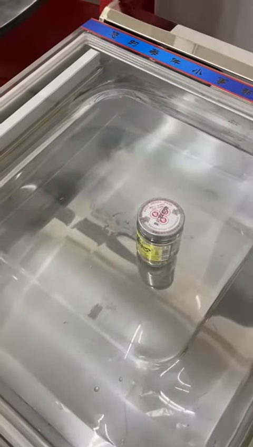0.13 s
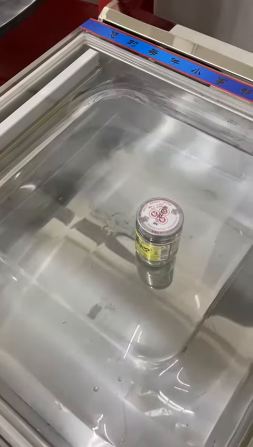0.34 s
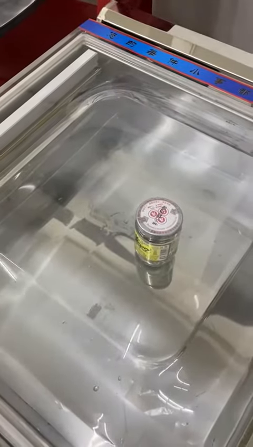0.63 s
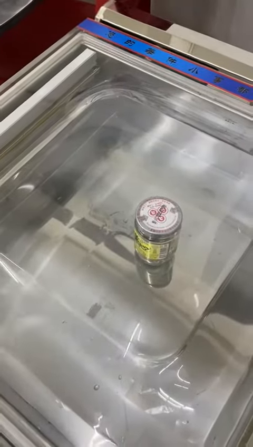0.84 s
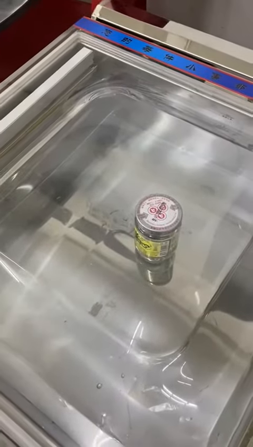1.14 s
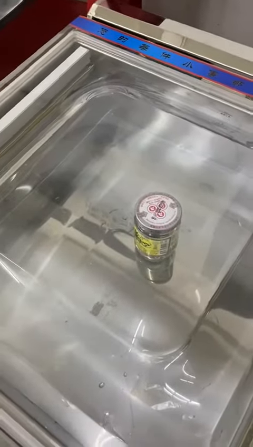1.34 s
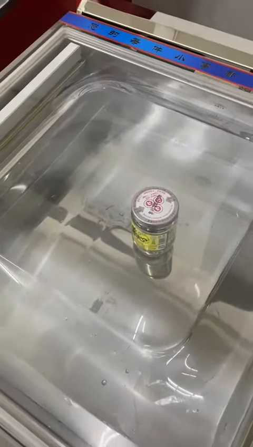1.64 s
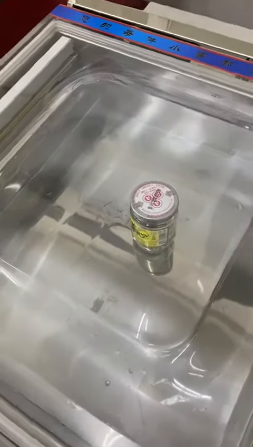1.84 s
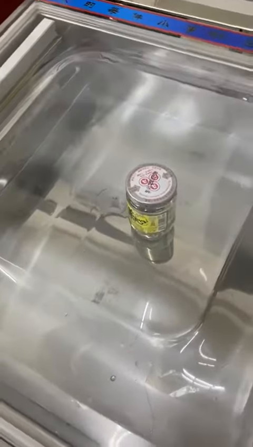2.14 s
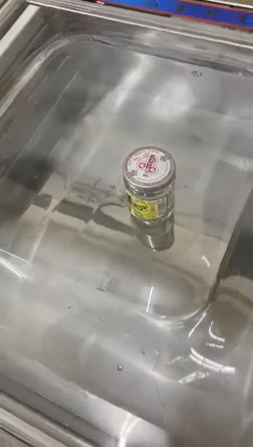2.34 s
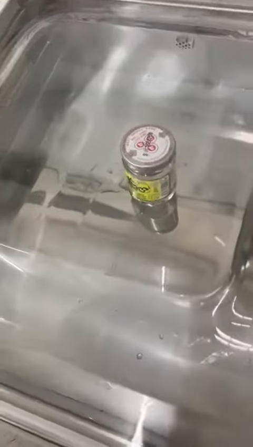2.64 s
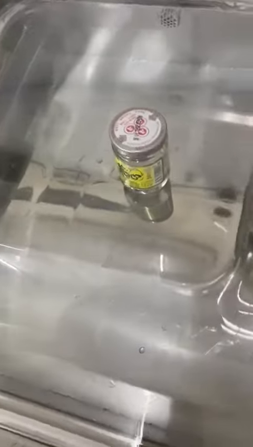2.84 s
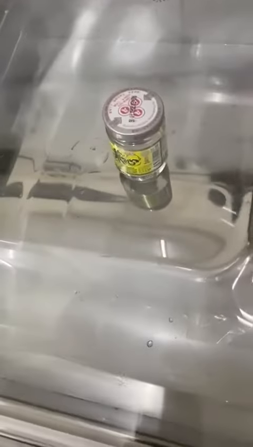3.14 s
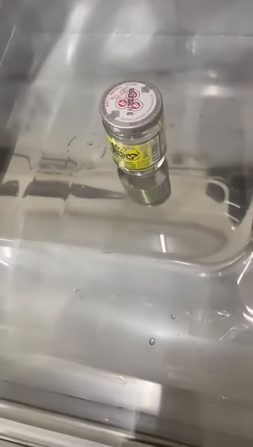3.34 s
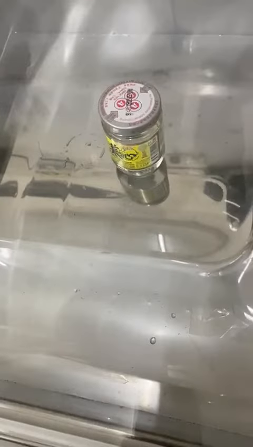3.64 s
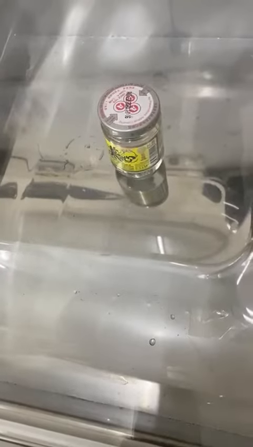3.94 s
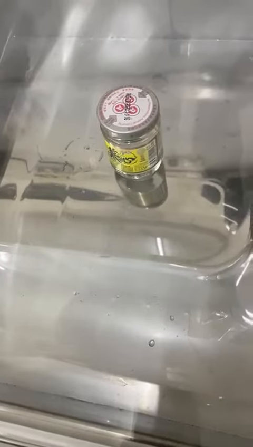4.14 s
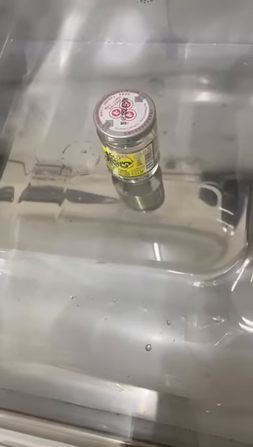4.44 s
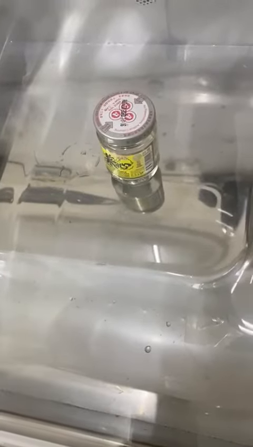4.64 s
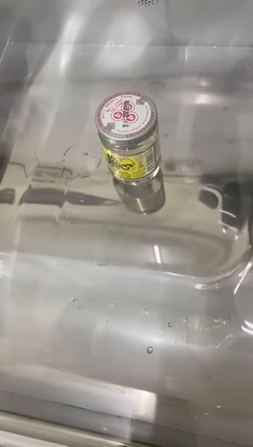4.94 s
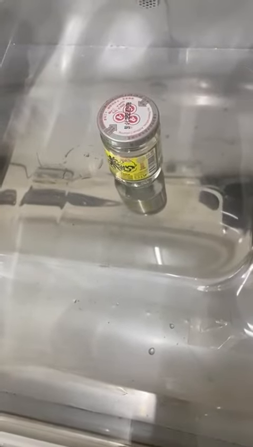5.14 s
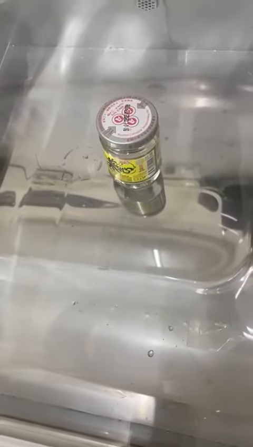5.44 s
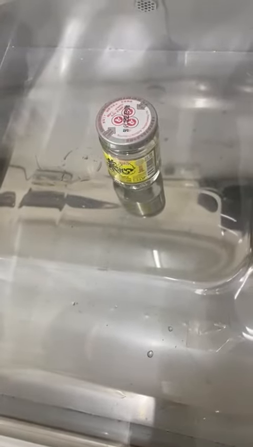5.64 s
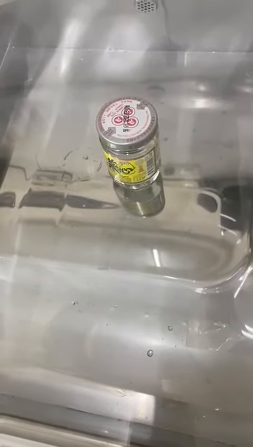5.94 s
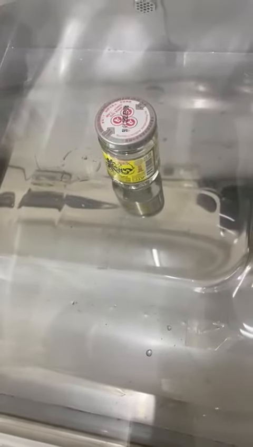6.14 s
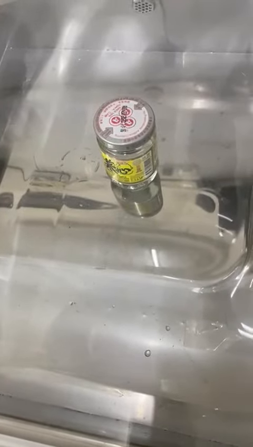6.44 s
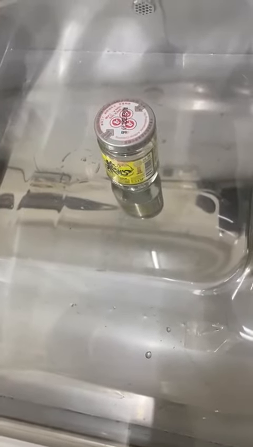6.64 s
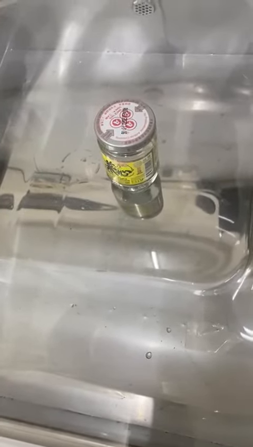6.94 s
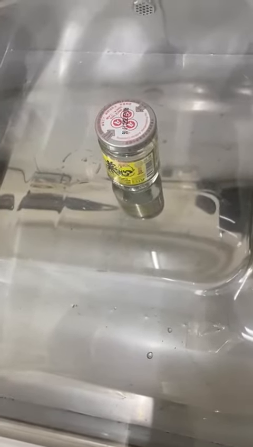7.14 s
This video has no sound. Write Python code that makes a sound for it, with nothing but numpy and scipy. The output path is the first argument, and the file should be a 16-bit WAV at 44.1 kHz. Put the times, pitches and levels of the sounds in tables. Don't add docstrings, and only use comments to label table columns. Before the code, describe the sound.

A vacuum pump runs close by in a small workshop: deep wavering hum, thick rumble, cabinet drone, whirr and thin hiss. The microphone moves nearer after two seconds and the tone shifts. Near the end a relay snaps, valves clatter hard against metal with puffs of air, and the motor stops, leaving a faint whistle, soft hiss and fading rumble.

```python
import sys
import numpy as np
from scipy import signal
from scipy.fft import rfft, irfft, next_fast_len
from scipy.io import wavfile
from scipy.ndimage import uniform_filter1d

SR = 44100
rng = np.random.default_rng(int(sys.argv[2]) if len(sys.argv) > 2 else 0)


def how_loud(loudness_db):
    steps = np.asarray(loudness_db, float) / 20
    return 10 ** steps


def wav_out(sig):
    wavfile.write(sys.argv[1], SR, np.round(np.clip(np.atleast_2d(sig).T, -1, 1) * 32767).astype(np.int16))


N = 321930
TIME = np.arange(N) / SR

MOVE_START_S, MOVE_END_S = 1.5, 3.27
STOP_S, EMPTY_S = 5.787, 2.4
SHUT_S, SHUT_FADE_S = 6.1, .23
SPIN_DOWN_S, SPIN_DOWN_DB = 1.49, -7.5
VANE_HZ = 146.96
HUM_HZ, HUM_FAR_DB, HUM_NEAR_DB = 100.2, -37, -28.5
HUM_CLEAR_START_S, HUM_CLEAR_END_S = 2.0, 2.3
LID_SLACK_HZ, LID_TIGHT_HZ, LID_TIGHTEN_S = 79.55, 95.6, 1.8
VALVE_RISE_S, VALVE_T60_S = .002, .065
GUST_LOW_CUT_HZ, BUMP_AIR_DB = 5000, -28
WHISTLE_HZ, WHISTLE_START_S, WHISTLE_END_S = 4820, 5.87, 6.74
WHISTLE_DB, WHISTLE_FADE_DB_PER_S = -50.5, 12
FLOOR_DB, LOW_CUT_HZ = -40.5, 28

# vane_order, first_spot_db, second_spot_db
VANE_TONES = [(1, -34.5, -35.5), (2, -64.5, -39.5), (4, -48, -52.5), (5, -52, -51.5), (6, -58, -50.5),
              (7, -58.5, -59), (8, -57, -63.5), (10, -58, -83.5), (12, -83, -73.5), (14, -83, -54.5),
              (21, -61, -55), (22, -70, -58.5), (23, -66, -57.5), (24, -58, -59.5)]
# time_s, level_db
LID_LEVEL = [(0, -22), (.3, -25), (.55, -36), (.88, -32), (1.0, -24.5), (1.65, -21), (1.78, -34),
             (2.2, -28.5), (2.5, -57)]
# start_db, vacuum_gain_db, near_gain_db, venting_db, coasting_db
AIR_LEVELS = [
    (-31, 5, 0, -25, -26),
    (-37, 3.5, 1, -33, -34),
    (-44.5, 1.56, 0.7, -42, -50.5),
    (-41, -5.5, -2.5, -42, -74.5),
]
# pitch_hz, density_db (per Hz)
RUMBLE_COLOUR = [(20, -24), (35, -9), (55, 4.5), (75, 14), (120, 10.5), (180, 8.5), (260, -5.5), (400, -38)]
# pitch_hz, density_db (per Hz)
DRONE_COLOUR = [(120, -34), (250, 4), (400, -2.5), (600, -3), (850, -8.5), (1150, -12), (1500, -29),
                (3000, -52.5)]
# pitch_hz, density_db (per Hz)
WHIRR_COLOUR = [(700, -25), (1200, -2), (1700, 0), (2300, -1), (2700, -1), (3400, -2), (4000, -6),
                (4800, -6), (5600, -13), (8000, -23), (11500, -30)]
# pitch_hz, density_db (per Hz)
HISS_COLOUR = [(3000, -25), (4500, -3), (5500, 0), (7000, -1.5), (8000, -2), (9400, -4.5), (10000, -3),
               (10500, -5), (11600, -6.5), (13000, -8), (16000, -40)]
# pitch_hz, width_hz, level_db
PANEL_MODES = [(56.5, 15, -38), (148.2, 20.4, -40.5), (213.7, 13.7, -36.5), (297, 20.6, -44),
               (386.6, 32, -45), (1644, 80, -57)]
# start_s, level_db
RELAY_HITS = [
    (5.7871, -5),
]
# pitch_hz, level_db, t60_s
RELAY_RING = [(1910, 11.5, 0.0072), (2220, 0, 0.017), (4080, 4.5, 0.011), (5950, -1, 0.01),
              (7900, -9, 0.0084), (8500, -2, 0.0066), (11100, -5.5, 0.011), (715, -4, 0.034)]
# start_s, level_db
VALVE_BLOWS = [(5.792, -8), (5.804, -7), (5.8105, 0), (5.8158, -10), (5.817, -15), (5.824, -4),
               (5.831, -11), (5.836, -10), (5.848, -8.5), (5.859, -9.5)]
# pitch_hz, level_db, t60_s
CABINET_RING = [(85.5, -13, 0.25), (147, -9.5, 0.092), (242, -9.5, 0.18), (369, 1, 0.055), (436, -5, 0.096),
                (543, 5, 0.039), (732, 0, 0.027), (840, 0, 0.026), (1090, -3, 0.028), (1270, -13, 0.051)]
# start_s, level_db
THUD_HITS = [
    (5.859, -6),
]
# pitch_hz, level_db, t60_s
THUD_RING = [(76, 5, .09), (125, 2, .06)]
# start_s, air_db, rattle_db
VALVE_PUFFS = [
    (5.79, -15.5, -18),
    (5.809, -12.5, -9),
    (5.827, -9, -19),
    (5.835, -15.5, -24),
    (5.858, -42, -21),
]
# start_s, level_db, rise_s, t60_s
AIR_GUSTS = [
    (5.972, -15, .01, .09),
    (7.277, -31, .035, .55),
]
# start_s, rattle_db, rise_s, t60_s
HOUSING_BUMPS = [
    (1.929, -28.5, 0.021, 1.0),
]
# pitch_hz, width_hz, level_db
HOUSING_MODES = [(490, 28, -2), (880, 45, -9), (3800, 900, -15)]
# pitch_hz, density_db (per Hz)
PUFF_COLOUR = [(600, -14), (1500, -3), (2500, 0), (3500, -2), (4200, -5), (5200, -1), (6500, -4), (7600, 0),
               (9300, -4), (9900, -13), (12000, -14)]
# pitch_hz, density_db (per Hz)
FLOOR_COLOUR = [(20, -22), (32, -2.5), (45, 3.5), (62, 2.5), (90, -8.5), (140, -48.5)]
# pitch_hz, t60_s
ROOM_DECAY = [(100, 0.24), (500, 0.69), (2000, 0.62), (8000, 0.13)]
# pitch_hz, likeness (0-1), right_phase_rad, left_over_right_db
PORT_PAIR = [(170, .999, 0, 0), (450, .9, .15, 2.6), (1150, .4, .4, -1.8), (1900, .9, -.1, .6),
             (2400, .2, 1.5, -4), (2800, .6, 3.1, 1.5), (3600, .15, 2, 2), (4300, .5, 3.14, -2),
             (5000, .88, 3.14, -.8), (5450, .91, 0, 0), (6700, .9, -.25, 0), (7200, .6, -.9, 0),
             (10200, .7, -2.9, 0), (10900, .88, -3.14, 0)]


def read(points, hz, column=1):
    table = np.transpose(points)
    return np.interp(np.log(hz + 1), np.log(table[0] + 1), table[column])


def evened(x):
    return x / np.sqrt(np.mean(x ** 2) + 1e-20)


def ramp(start, end):
    return np.clip((TIME - start) / (end - start), 0, 1)


def burst(start, rise, t60):
    t = np.maximum(TIME - start, 0)
    return how_loud(-60 * t / t60) * (1 - np.exp(-t / rise))


def wander(rate, count=16):
    t = TIME[::256]
    slow = 0
    for hz in np.geomspace(rate / 12, rate, count):
        slow = slow + np.sin(2 * np.pi * (hz * t + rng.random())) / np.sqrt(hz)
    return np.interp(TIME, t, evened(slow))


def noise(colour, patchy_db=1.5):
    frames, hz = N // 512 + 5, np.fft.rfftfreq(2048, 1 / SR)
    a, b, c, d, patches = rng.standard_normal((frames, 1025, 5)).T
    patches = uniform_filter1d(patches, size=16, axis=0)
    patches = evened(uniform_filter1d(patches, size=6, axis=1))
    gain = how_loud(read(colour, hz)[:, None] + patchy_db * patches)
    spectrum = np.array([a + 1j * b, c + 1j * d]) * gain
    return evened(signal.istft(spectrum, nperseg=2048, noverlap=1536)[1][:, :N])


def resonate(x, hz, width):
    turn, r = np.exp(2j * np.pi * hz * TIME), np.exp(-np.pi * width / SR)
    smooth = signal.lfilter([1], [1, -2 * r, r * r], x / turn)
    return evened((turn * smooth).real)


def tone(phase):
    return np.sqrt(2) * np.array([np.sin(phase), np.cos(phase)])


def ring(modes, hits, rise=0.00023):
    t, out = np.arange(SR // 3) / SR, np.zeros((2, N + SR))
    onset = 1 - np.exp(-t / rise)
    shapes = [how_loud(db - 60 * t / t60) * np.sin(2 * np.pi * hz * t) * onset for hz, db, t60 in modes]
    for start, db in hits:
        mix = rng.uniform(0.24, 1.5, (2, len(modes)))
        out[:, round(start * SR):][:, :len(t)] += how_loud(db - 10) * mix @ shapes
    return out[:, :N]


def motor_tone(hz, db, waver):
    phase = 2 * np.pi * np.cumsum(hz) / SR + waver * wander(6.3)
    return (1 - ramp(STOP_S - .02, STOP_S)) * how_loud(db) * tone(phase)


def hum():
    clear = ramp(HUM_CLEAR_START_S, HUM_CLEAR_END_S)
    return motor_tone(np.full(N, HUM_HZ), HUM_FAR_DB + (HUM_NEAR_DB - HUM_FAR_DB) * clear, 0.028)


def vanes():
    moved = ramp(MOVE_START_S, MOVE_END_S)
    shaft = 2 * np.pi * VANE_HZ * TIME + 0.06 * wander(5)
    out = np.zeros((2, N))
    for order, first_db, second_db in VANE_TONES:
        db = first_db + (second_db - first_db) * moved + 1.6 * wander(4.7)
        out += how_loud(db) * tone(order * shaft + 2 * np.pi * rng.random())
    return out * (TIME < RELAY_HITS[0][0])


def lid():
    hz = LID_TIGHT_HZ + (LID_SLACK_HZ - LID_TIGHT_HZ) * np.exp(-TIME / LID_TIGHTEN_S)
    return motor_tone(hz, np.interp(TIME, *np.transpose(LID_LEVEL)), 0.078)


def level(start_db, vacuum_db, near_db, vent_db, coast_db):
    vacuum = 1 - np.exp(-TIME / EMPTY_S)
    running = start_db + vacuum_db * vacuum + near_db * ramp(MOVE_START_S, MOVE_END_S)
    vent = np.exp(-(np.maximum(TIME - SHUT_S, 0) / SHUT_FADE_S) ** 1.46)
    return how_loud(np.where(TIME < STOP_S, running, coast_db + (vent_db - coast_db) * vent))


def airflow():
    rumble, drone, whirr, hiss = (level(*row) for row in AIR_LEVELS)
    spin = how_loud(SPIN_DOWN_DB * (np.maximum(TIME - STOP_S, 0) / SPIN_DOWN_S) ** 4)
    beat = 1 + 0.082 * np.cos(2 * np.pi * VANE_HZ * TIME) * (TIME < STOP_S)
    shake = rng.standard_normal((2, N))
    panels = np.zeros((2, N))
    for hz, width, db in PANEL_MODES:
        panels += how_loud(db + 0.53 * wander(3.3)) * resonate(shake, hz, width)
    body = how_loud(-4) * noise(RUMBLE_COLOUR, patchy_db=0.2) + how_loud(28) * panels
    out = rumble * spin * body
    out += drone * spin ** .6 * noise(DRONE_COLOUR, patchy_db=1.3)
    out += whirr * beat * how_loud(1) * noise(WHIRR_COLOUR, patchy_db=2)
    out += hiss * how_loud(1.5 + 0.19 * wander(12)) * noise(HISS_COLOUR, patchy_db=2.56)
    return out


def clatter():
    relay = ring(RELAY_RING, RELAY_HITS)
    cabinet = ring(CABINET_RING, VALVE_BLOWS, rise=0.00075)
    return relay + cabinet + ring(THUD_RING, THUD_HITS)


def puffs():
    grain = how_loud(2.8 * evened(uniform_filter1d(rng.standard_normal(N), size=60)))
    air = grain * noise(PUFF_COLOUR, patchy_db=1.5)
    rattle = grain * noise(DRONE_COLOUR, patchy_db=5.5)
    high_pass = signal.butter(2, GUST_LOW_CUT_HZ, "high", fs=SR, output="sos")
    jet = evened(signal.sosfilt(high_pass, air))
    housing = rattle + how_loud(BUMP_AIR_DB) * air
    for hz, width, db in HOUSING_MODES:
        housing += how_loud(db) * resonate(air, hz, width)
    out = np.zeros((2, N))
    for start, air_db, rattle_db in VALVE_PUFFS:
        out += burst(start, VALVE_RISE_S, VALVE_T60_S) * (how_loud(air_db) * air + how_loud(rattle_db) * rattle)
    for start, db, rise, t60 in AIR_GUSTS:
        out += how_loud(db) * burst(start, rise, t60) * jet
    for start, db, rise, t60 in HOUSING_BUMPS:
        out += how_loud(db) * burst(start, rise, t60) * housing
    return out


def whistle():
    air = rng.standard_normal((2, N))
    on = ramp(WHISTLE_START_S, WHISTLE_START_S + .03) * (1 - ramp(WHISTLE_END_S - .05, WHISTLE_END_S))
    db = WHISTLE_DB - WHISTLE_FADE_DB_PER_S * (TIME - WHISTLE_START_S) + 2.5 * wander(15)
    vent = on * how_loud(db) * resonate(air, WHISTLE_HZ, width=22)
    nozzle = how_loud(-44) * burst(5.97, rise=0.0077, t60=.7) * resonate(air, hz=3500, width=260)
    early_band = how_loud(-53) * (1 - ramp(MOVE_START_S, MOVE_END_S)) * resonate(air, hz=2400, width=170)
    return vent + nozzle + early_band


def room(x):
    taps = np.zeros((2, SR))
    at = np.arange(200, SR - 20, 20) + rng.integers(0, 20, (2, (SR - 201) // 20))
    np.put_along_axis(taps, at, rng.choice([-1., 1.], at.shape), 1)
    hz, t, z = signal.stft(taps, SR, nperseg=256)
    decay = how_loud(-60 * t / read(ROOM_DECAY, hz)[:, None])
    tail = signal.istft(z * decay, SR, nperseg=256)[1]
    return signal.fftconvolve(x, tail / np.linalg.norm(tail[0]), axes=1)[:, :N]


def building():
    return how_loud(FLOOR_DB) * noise(FLOOR_COLOUR, patchy_db=-3)


def scene():
    release = clatter() + puffs()
    pump = hum() + vanes() + lid() + airflow()
    return pump + release + whistle() + how_loud(-11.5) * room(release) + building()


def band_limit(x):
    return signal.sosfilt(signal.butter(12, 12110, fs=SR, output="sos"), x)


def record(dry):
    size = next_fast_len(N + 4096)
    hz = np.fft.rfftfreq(size, 1 / SR)
    shared, apart = rfft(dry, size) * hz ** 3 / (hz ** 3 + LOW_CUT_HZ ** 3)
    like = np.clip(read(PORT_PAIR, hz), 0, 1)
    turn = np.exp(1j * read(PORT_PAIR, hz, column=2))
    tilt = how_loud(read(PORT_PAIR, hz, column=3) / 2)
    right = like * turn * shared + np.sqrt(1 - like ** 2) * apart
    ports = irfft(np.array([shared * tilt, right / tilt]), size)[:, :N]
    mix = np.tanh(ports)
    return band_limit(mix)


dry = scene()
out = record(dry)
wav_out(out)
```